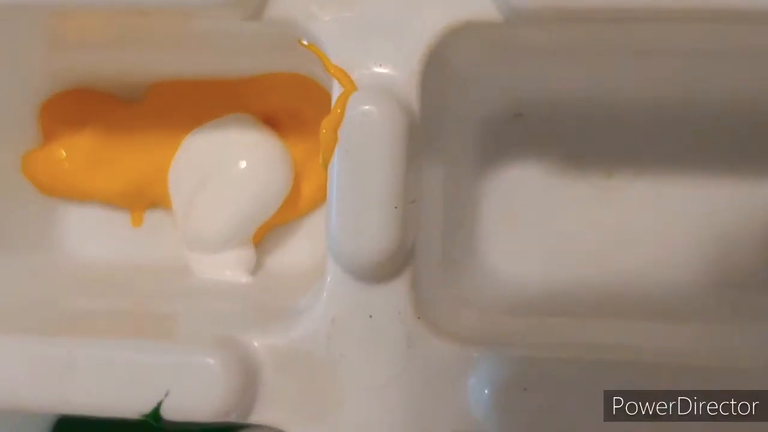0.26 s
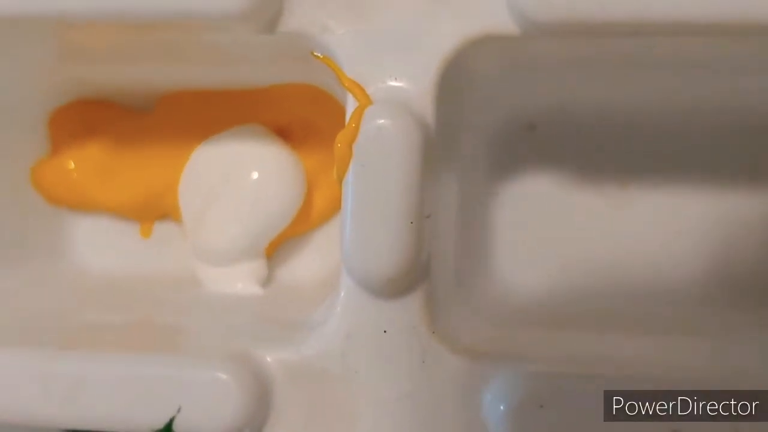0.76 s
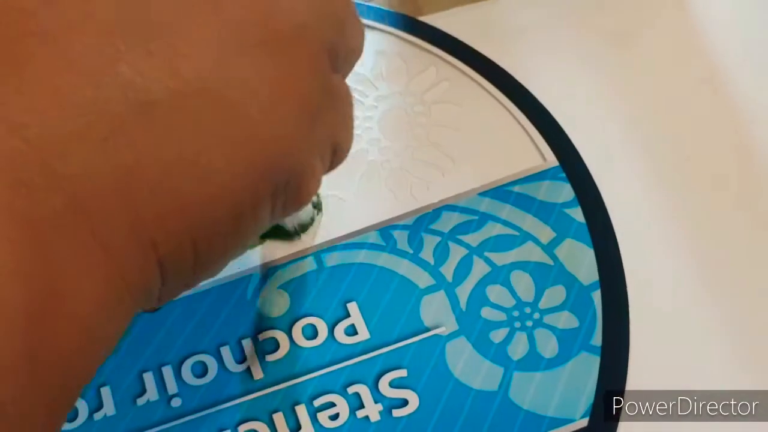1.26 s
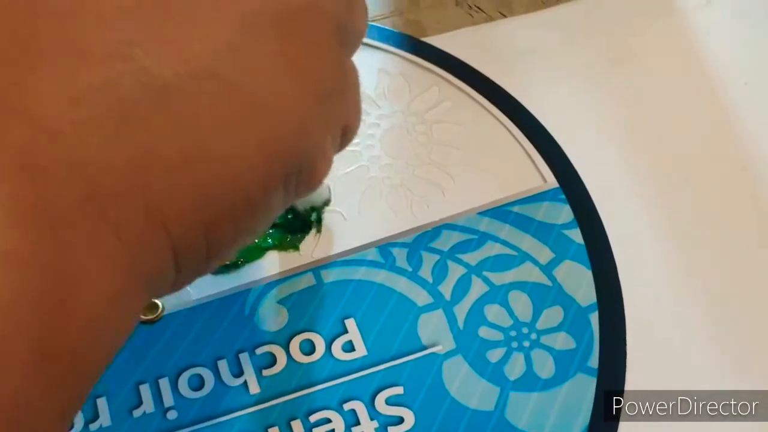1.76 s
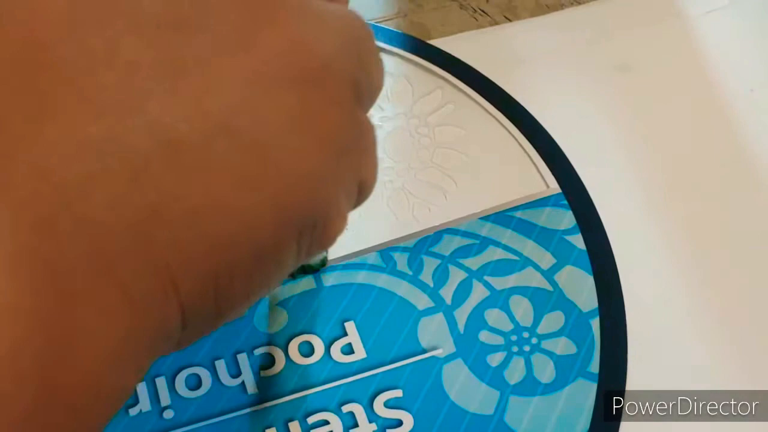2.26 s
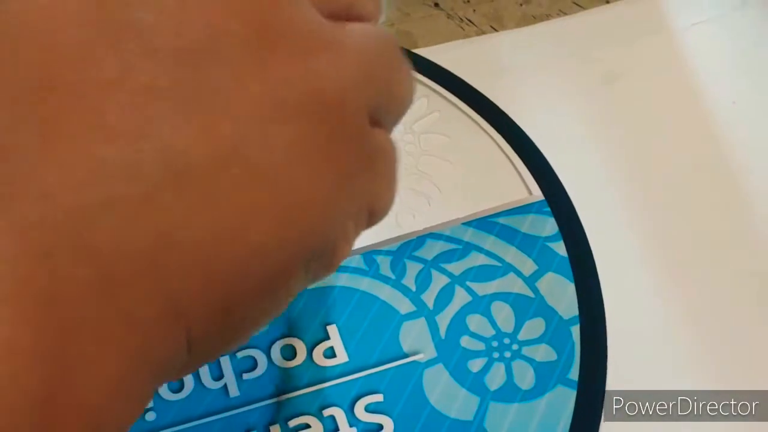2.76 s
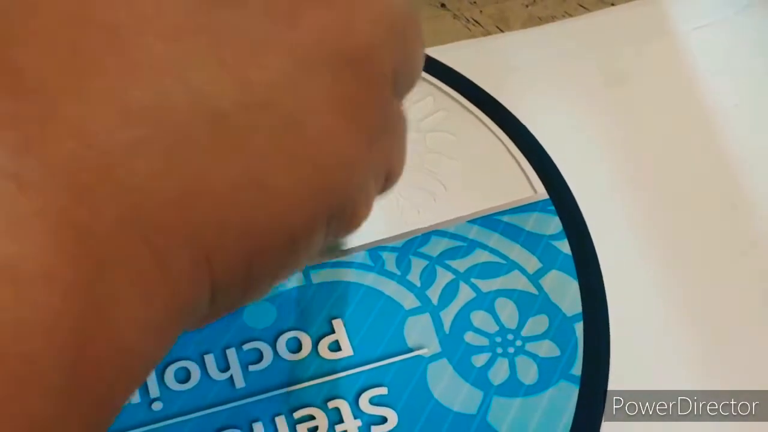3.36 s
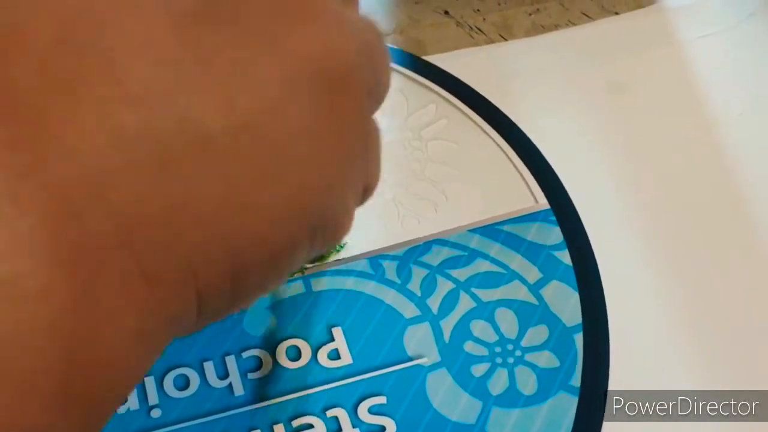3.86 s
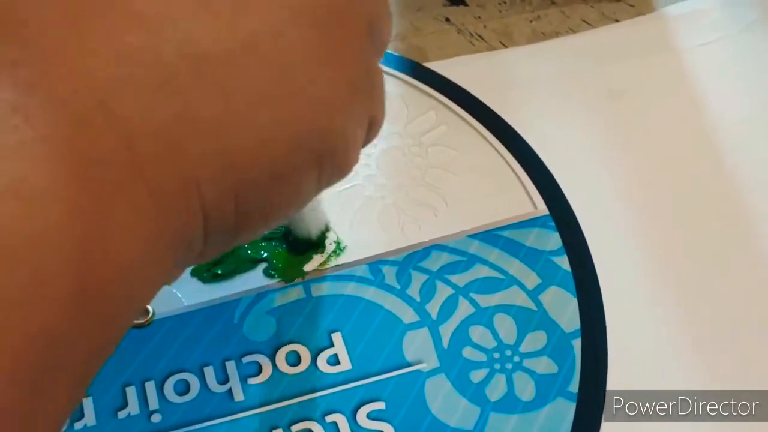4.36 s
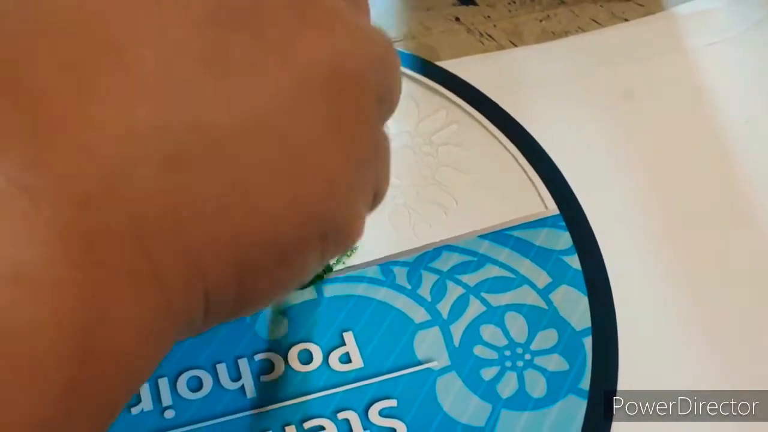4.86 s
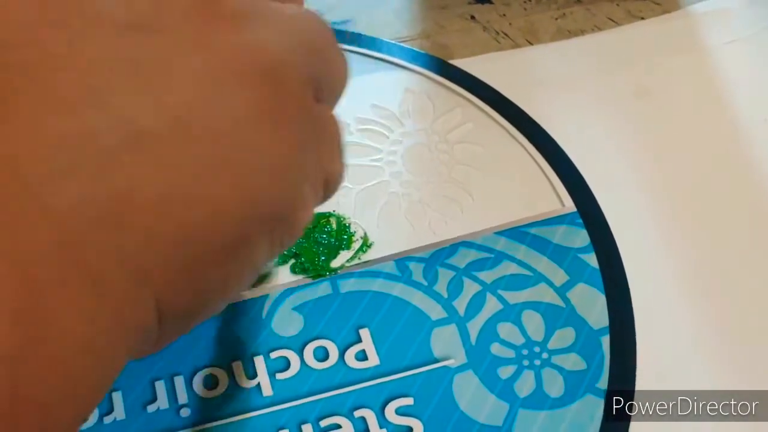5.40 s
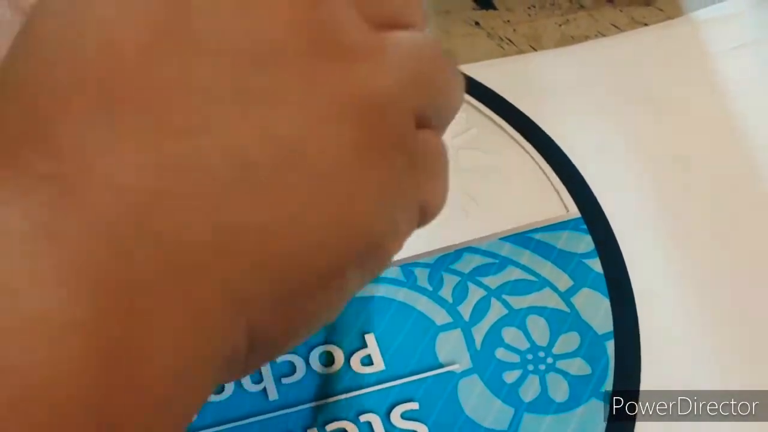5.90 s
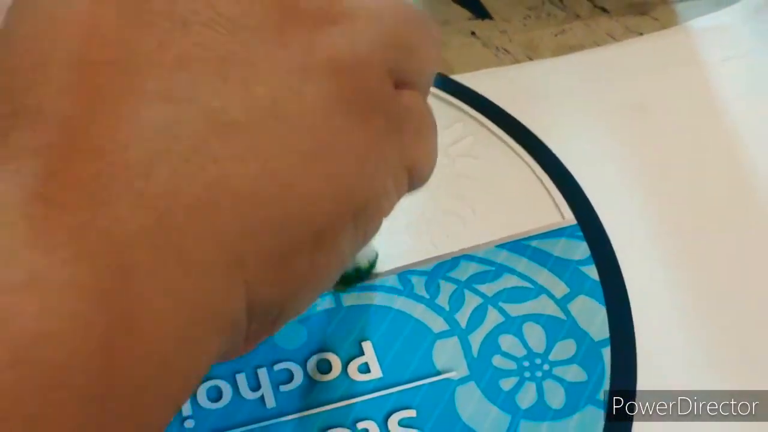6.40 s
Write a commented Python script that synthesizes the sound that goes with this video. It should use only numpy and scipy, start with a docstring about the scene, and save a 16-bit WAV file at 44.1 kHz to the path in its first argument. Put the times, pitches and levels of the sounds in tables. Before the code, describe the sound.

After a near-silent moment with one muffled bump, a bristle brush abruptly starts dabbing tacky paint through plastic onto drum-like canvas, close up.

```python
"""A stencil brush dabs paint through plastic onto stretched canvas, close to a phone's two microphones in a small room.
Each dab is a crunch of noise grains for the bristle tips, decaying sines for canvas and frame,
and a swelling run of grains as the tacky paint peels; bursts of noise make the stencil snaps and soft ticks.
A hush of shaped noise with one muffled bump comes first; the dabbing starts abruptly with a click,
over a soft noise wash and a low wavering hum that sinks away."""
import sys
import numpy as np
from scipy import signal
from scipy.fft import rfft, irfft
from scipy.io import wavfile
from scipy.ndimage import uniform_filter1d

SR = 44100
rng = np.random.default_rng(int(sys.argv[2]) if len(sys.argv) > 2 else 0)


def transcribe(u):
    """Save the signal u as a 16-bit wav file named by the first command-line argument.

    u: samples, shape (n,) or (channels, n), limited to [-1, 1]; the rate is SR.
    q: integer samples, one column per channel.
    """
    v = np.clip(np.atleast_2d(u).T, -1, 1)
    q = np.round(v * 32767).astype(np.int16)
    wavfile.write(sys.argv[1], SR, q)


N = 292824
TIME = np.arange(N) / SR
HIT = TIME[:SR // 2]  # the half second given to each single sound
START_S = .7495  # the dabbing and its background are silent before this


def undb(db):
    """Decibels to gain."""
    return 10 ** (np.asarray(db) / 20)


def unit(x):
    """Scale to rms 1."""
    return x / np.sqrt(np.mean(x ** 2))


def add(track, s, x):
    """Mix x into the two-channel track from time s."""
    i = min(int(s * SR), N)
    track[:, i:i + x.shape[1]] += x[:, :N - i]


def convolve(x, response):
    """Pass x through one response, or through one for each channel."""
    return signal.fftconvolve(np.atleast_2d(x), np.atleast_2d(response), axes=1)[:, :N]


def colour(x, points, size=2048, keep_power=True):
    """Causal minimum-phase filter with the given (frequency [Hz], level [dB]) spectrum."""
    hz, db = np.transpose(points)
    bins = np.maximum(np.fft.rfftfreq(size, 1 / SR), 1)
    log_gain = np.log(undb(np.interp(np.log(bins), np.log(hz), db)))
    # folding the cepstrum onto positive times makes the filter causal
    cepstrum = irfft(log_gain)
    cepstrum[1:size // 2] *= 2
    cepstrum[size // 2 + 1:] = 0
    response = irfft(np.exp(rfft(cepstrum)))
    if keep_power:
        response = response / np.linalg.norm(response)
    return convolve(x, response)


def band(x, hz, kind):
    """Gentle low-, high- or band-pass."""
    return signal.sosfilt(signal.butter(2, hz, kind, fs=SR, output="sos"), x)


def grains(rate, spread_db):
    """Tiny clicks of unequal size at random times, rate a second on average; rms 1."""
    n = len(HIT)
    sizes = undb(spread_db * np.clip(rng.standard_normal(n), -2, 2)) * rng.choice([-1, 1], n)
    struck = rng.random(n) < rate / SR
    return unit(sizes * struck)


def waver(rate):
    """Smooth random wander through rate new values a second, with a spread near 1."""
    return np.interp(TIME * rate, np.arange(1000), rng.standard_normal(1000))


def diffuse(size, apart_hz=750, own_db=-8):
    """Noise from all around: nearly alike at both microphones in the bass, unrelated in the treble."""
    common, own = rng.standard_normal(size), rng.standard_normal((2, size))
    shared_bass = band(common, apart_hz, "lowpass")
    separate_treble = band(own, apart_hz, "highpass")
    return shared_bass + separate_treble + undb(own_db) * rng.standard_normal((2, size))


def place(x, near_db=-4, near_s=0.0031):
    """Hand and table scatter the treble into the two close microphones, differently from each spot."""
    early = HIT[:len(HIT) // 20]
    scatter = band(rng.standard_normal((2, len(early))), 1600, "highpass") * np.exp(-early / near_s)
    near = undb(near_db) * scatter / np.linalg.norm(scatter, axis=1, keepdims=True)
    # direct sound: the left microphone is nearer by a few samples
    near[0, 0] += 1
    near[1, rng.integers(5, 10)] += 1
    return convolve(x, near)


# spectrum of the quiet room: (frequency [Hz], relative level [dB per Hz])
HUSH_SPECTRUM = [(25, -4), (80, -1), (130, -7), (270, -13), (520, -13), (900, -19), (2600, -33.5),
                 (4800, -37), (12000, -47.5)]
# spectrum of the muffled bump: (frequency [Hz], relative level [dB per Hz])
BUMP_SPECTRUM = [(50, -20), (120, -2.5), (190, 0.5), (270, -12), (380, 0), (520, -3), (650, -24),
                 (1500, -33), (5000, -56)]


def hush(floor_db=-72, bump_db=-61, bump_s=0.37, bump_width_s=0.057):
    """Steady shaped noise for the quiet room, and a short swell of low noise for the one muffled bump."""
    bump = colour(diffuse(N), BUMP_SPECTRUM) * np.exp(-((TIME - bump_s) / bump_width_s) ** 2)
    return undb(floor_db) * colour(diffuse(N), HUSH_SPECTRUM) + undb(bump_db) * bump


# spectrum of the soft background wash: (frequency [Hz], relative level [dB per Hz])
WASH_SPECTRUM = [(28, -0.5), (55, -3.5), (150, -9.5), (280, -17), (450, -17), (700, -16), (1200, -14),
                 (2300, -29.5), (4500, -37.5), (8000, -39), (12000, -43)]
# slow course of the wash, before the room's microphone colour: (time [s], level [dB])
WASH_COURSE = [(.75, -55), (1.4, -64.5), (2.85, -72), (3.4, -62), (6.64, -62.5)]


def wash():
    """Diffuse noise around the microphones sinks, then swells again, with a slight flutter."""
    level_db = np.interp(TIME, *np.transpose(WASH_COURSE)) + 0.42 * waver(rate=17)
    return colour(diffuse(N), WASH_SPECTRUM) * undb(level_db)


def hum(hum_hz=166.2, start_db=-56, fade_db_per_s=11, sinks_s=1.1, sag_octaves_per_s=0.38):
    """Three unsteady sines fade steadily from the start; from sinks_s on their pitch falls too."""
    hz = hum_hz * 2 ** (-sag_octaves_per_s * np.maximum(TIME - sinks_s, 0))
    lines = 0
    for ratio, line_db in [(1, 0), (1.2, -8), (1.43, -13)]:
        phase = 2 * np.pi * np.cumsum(ratio * hz * (1 + 0.012 * waver(rate=33))) / SR
        lines = lines + np.sin(phase) * undb(line_db + 3.7 * waver(rate=23))
    return lines * undb(start_db - fade_db_per_s * (TIME - START_S))


# dabs: (time [s], force [dB over an ordinary dab], bristle crunch [dB], canvas pitch [Hz],
#        woody click [dB], paint tack [dB])
DABS = [(0.7435, -2.5, -37.5, 98.5, -72, -52), (.938, -1, -36, 102.3, -53.5, -61),
        (1.1162, -4, -40.5, 101, -55, -53.5), (1.34, 2.5, -41, 80, -53, -53),
        (1.5363, -4, -46, 96, -57.5, -61.5), (1.722, -4.5, -40, 94, -55.5, -50),
        (1.928, 2, -39, 86, -56.5, -48.5), (2.123, -5, -45, 70, -56, -54),
        (2.344, -1.5, -48.5, 69.4, -62.5, -72), (2.5852, 4, -43.5, 88, -52.5, -44),
        (2.81, -1.5, -46.5, 85, -63, -45), (3.0548, -.5, -45, 78.5, -49.5, -44),
        (3.2969, 2, -38, 86, -53, -53.5), (3.54, 5, -39.5, 75.7, -59, -45),
        (3.767, 5, -42.5, 74.6, -52.5, -52.5), (3.988, 1.5, -43.5, 98.5, -57, -58.5),
        (4.1821, -2.5, -42.5, 90, -54, -56.5), (4.378, -3, -43, 95, -51, -47),
        (4.558, -4, -41, 96.5, -57, -57), (4.7611, 1, -43.5, 67, -51.5, -54.5),
        (5.0387, 10.5, -37, 92.8, -56.5, -51), (5.2573, 9, -37.5, 94.7, -54.5, -49),
        (5.5135, 9, -42.5, 87.4, -51.5, -45), (5.7252, 2.5, -42, 68.6, -49, -58),
        (5.9225, -6, -43, 58, -58, -62.5), (6.1165, -6.5, -47, 76.4, -66, -56.5),
        (6.32, -4.5, -49.5, 98, -56, -61), (6.5171, -6.5, -48, 100, -58.5, -57.5)]
# spectrum of bristle tips on the plastic: (frequency [Hz], relative level [dB per Hz])
CRUNCH_SPECTRUM = [(150, -24.5), (500, -8), (1000, -17), (1600, -0.5), (2200, 0), (3000, 1.5), (4500, -7),
                   (6000, -8), (6800, -2.5), (8000, -22), (11500, -30)]
# the stencil rings a little differently under every dab: centre [Hz], spread [octaves]
SHEET_HZ, SHEET_SPREAD = 4040, 0.23
# tips of an ordinary dab land over this time [s], with this crunch [dB]
LANDING_S, CRUNCH_DB = 0.0026, -42
LANDING_GROWTH = 0.54  # dB per dB: a firm dab that crunches little comes in at a slant and lands longer


def bristles(splay_db=-16, splay_s=0.039, crackle_db=6, sheet_db=-8, early_db=-14, early_s=0.0022):
    """Stray hairs touch first, tips land within milliseconds, then crackle as they splay; the stencil colours all."""
    out = np.zeros((2, N))
    lead_s = .02  # room for the stray hairs
    t = HIT - lead_s
    after = np.maximum(t, 0)
    for s, force, db, *_ in DABS:
        length = LANDING_S * undb(LANDING_GROWTH * (force - (db - CRUNCH_DB)))
        sheet_hz = SHEET_HZ * 2 ** np.clip(SHEET_SPREAD * rng.standard_normal(), -1, 1)
        contact = 1 - np.exp(-after / 0.00095)
        stray = undb(early_db) * np.exp(-np.abs(t) / early_s)
        landing = np.exp(-(after / length) ** 2) * contact + stray
        splay = undb(splay_db) * np.exp(-after / splay_s) * contact
        crunch = landing * grains(rate=20000, spread_db=0.0) + splay * grains(rate=1800, spread_db=crackle_db)
        ring = band(crunch, [sheet_hz * .75, sheet_hz * 1.3], "bandpass")
        add(out, s - lead_s, undb(db) * place(crunch + undb(sheet_db) * ring))
    return colour(out, CRUNCH_SPECTRUM)


# modes of frame and board, detuned a little per dab: (frequency [Hz], level [dB], 60 dB decay time [s])
FRAME_MODES = [(121.5, 8, 0.17), (157.7, 2, 0.31), (247, -1.5, 0.2), (310.7, -1, 0.12), (396, 4, 0.066),
               (467, 1.5, 0.045), (518, -1, 0.056), (524, -24, 0.011), (595, -11.5, 0.11),
               (796, -10.5, 0.028)]
# how strongly the spot being painted drives the frame: (time [s], level [dB])
FRAME_DRIVE = [(.75, -2.5), (2.8, -2), (4.2, 2), (5.2, 0), (6.6, -1)]
# spectrum of the dry woody click: (frequency [Hz], relative level [dB per Hz])
CLICK_SPECTRUM = [(100, -17), (350, -2.5), (700, -1.5), (1100, 0.5), (1600, -9), (2500, -10.5), (6000, -26)]
# knock of an ordinary dab [dB], and its growth with force [dB per dB]
KNOCK_DB, KNOCK_GROWTH = -62.5, 0.6


def frame(push_s=0.0096, detune=0.018, click_s=0.011):
    """The uneven push of buckling bristles rings the frame, differently at each spot, with a dry woody click."""
    out, clicks = np.zeros((2, 2, N))
    hz, db, t60 = np.transpose(FRAME_MODES)[:, :, None]
    for s, force, _, _, wood_db, _ in DABS:
        tuning, spot = rng.standard_normal((2, len(FRAME_MODES), 1))
        decay = undb(db + spot - 60 * HIT / t60)
        modes = decay * np.sin(2 * np.pi * hz * (1 + detune * tuning) * HIT)
        push = grains(rate=2700, spread_db=4.0) * HIT / push_s * np.exp(-(HIT / push_s) ** 2 / 2)
        rings = signal.fftconvolve(push[None], modes, axes=1)[:, :len(HIT)]
        # every mode takes its share of the blow
        knock = (undb(db) * rings / rings.std(axis=1, keepdims=True)).sum(axis=0)
        knock_db = KNOCK_DB + KNOCK_GROWTH * force + np.interp(s, *np.transpose(FRAME_DRIVE))
        add(out, s, undb(knock_db) * place(unit(knock)))
        buckling = grains(rate=5000, spread_db=4.5) * np.sqrt(HIT / click_s) * np.exp(1 - HIT / click_s)
        add(clicks, s, undb(wood_db) * place(buckling))
    return out + colour(clicks, CLICK_SPECTRUM)


# thump of an ordinary dab [dB]; the canvas gives way this long after the dab's time [s]
THUMP_DB, PRESS_S = -39, 0.0028
# spots slacker, so lower in pitch, than this [Hz] give more overtone [dB per octave]
CANVAS_HZ, SLACK_DB_PER_OCTAVE = 81, 13.5


def canvas(rise_s=0.0061, hold_s=0.025, overtone_hz=171, overtone_db=-7, overtone_growth=0.27,
           ring_db=-30, ring_s=0.11):
    """The canvas swings two or three times like a slack drum, until the pressed brush damps it."""
    out = np.zeros((2, N))
    damping = np.exp(-(HIT / hold_s) ** 6) + undb(ring_db) * np.exp(-HIT / ring_s)
    for s, force, _, hz, *_ in DABS:
        rise = 1 - np.exp(-HIT * undb(force / 2) / rise_s)  # a firm dab sets it going sooner
        upper_hz = overtone_hz * (1 + 0.02 * rng.standard_normal())
        upper_db = overtone_db + overtone_growth * force + SLACK_DB_PER_OCTAVE * np.log2(CANVAS_HZ / hz)
        drum = np.sin(2 * np.pi * hz * HIT) + undb(upper_db) * np.sin(2 * np.pi * upper_hz * HIT)
        sag = undb(-30) * np.sin(2 * np.pi * 32 * HIT) * np.exp(-HIT / 0.047)  # the whole board rocks
        add(out, s + PRESS_S, undb(THUMP_DB + force) * place(drum * rise * damping + sag))
    return out


# how long the hand keeps the brush down, before the rebound: (time of the dab [s], hold [s])
HOLD_COURSE = [(.75, 0.074), (1.72, 0.077), (2.6, 0.11), (3.8, 0.09), (4.38, .075), (4.76, 0.091),
               (6.6, 0.089)]
REBOUND_S_PER_DB = .0016  # a firm dab rebounds sooner


def lift_time(s, force):
    """When the brush that landed at s with this force comes free."""
    return s + np.interp(s, *np.transpose(HOLD_COURSE)) - REBOUND_S_PER_DB * force


# spectrum of the peeling paint: (frequency [Hz], relative level [dB per Hz])
PEEL_SPECTRUM = [(100, 3), (400, -1.5), (1000, -4), (2000, 2), (3000, -3), (4400, -3.5), (5500, -8),
                 (6700, -2.5), (8000, -14), (11500, -19)]
# paint of this tack [dB] has this build-up time [s]; tackier paint lets go more suddenly [dB per dB]
TACK_DB, BUILD_S, BUILD_SHORTENING = -52.5, .014, 0.63


def peels(release_s=0.014, lead_s=.06, creep_db=-7, snap_s=0.0014):
    """Threads of tacky paint break, swelling exponentially until the brush comes free with a last tug."""
    out = np.zeros((2, N))
    t = HIT - lead_s
    for s, force, *_, tack_db in DABS:
        build = BUILD_S * undb(BUILD_SHORTENING * (TACK_DB - tack_db))
        pull = undb(creep_db) * np.exp(np.minimum(t / (2 * build), -t / release_s))
        tug = np.exp(-np.abs(t) / snap_s) * min(0.0068 / build, 1)  # a quick lift ends more sharply
        threads = (pull + tug) * grains(rate=9000, spread_db=2.5)
        add(out, lift_time(s, force) - lead_s, undb(tack_db) * place(threads))
    return colour(out, PEEL_SPECTRUM)


# loudest snaps of the stencil coming unstuck:
# (time [s], peak level [dB before the boost in scene()], brightest frequency [Hz])
LOUD_SNAPS = [(.786, -45.5, 4470), (1.762, -55.5, 4630), (3.380, -52, 4220), (3.671, -48.5, 4900),
              (3.698, -46, 5200), (3.871, -45, 4360), (5.568, -46, 5100), (5.817, -56, 4400)]
# faint snap around every lift: level [dB before the same boost], its spread [dB], spread in time [s]
FAINT_SNAP_DB, FAINT_SPREAD_DB, FAINT_SPREAD_S = -66.5, 2.5, 0.0076


def snaps(decay_s=0.00027, body_db=-12):
    """Short cracks that ring the thin plastic sheet: a few loud ones, and a faint one around every lift."""
    out = np.zeros((2, N))
    faint = []
    for s, force, *_ in DABS:
        late, loud, bright = rng.standard_normal(3)
        snap_s = lift_time(s, force) + FAINT_SPREAD_S * late
        snap_hz = SHEET_HZ * 2 ** (SHEET_SPREAD * bright)
        faint.append((snap_s, FAINT_SNAP_DB + FAINT_SPREAD_DB * loud, snap_hz))
    for s, db, hz in list(LOUD_SNAPS) + faint:
        crack = rng.standard_normal(len(HIT)) * np.exp(-HIT / decay_s)
        ring = band(crack, [hz * .8, hz * 1.2], "bandpass")
        snap = ring + undb(body_db) * crack
        add(out, s, undb(db) * place(snap / np.abs(snap).max(), near_db=-13.5))
    return colour(out, CRUNCH_SPECTRUM)


# light touches of the hand on the board between dabs:
# (time [s], peak level [dB before a 6 dB boost], frequency [Hz])
HAND_TOUCHES = [(4.531, -52, 750), (6.038, -53.5, 513), (6.283, -55, 835)]


def touches(decay_s=0.0014):
    """Soft, dull ticks on the board: band-passed bursts of noise."""
    out = np.zeros((2, N))
    for s, db, hz in HAND_TOUCHES:
        burst = rng.standard_normal(len(HIT)) * np.exp(-HIT / decay_s)
        tick = band(burst, [hz / 2, hz * 2.3], "bandpass")
        add(out, s, undb(db + 6) * place(tick / np.abs(tick).max()))
    return out


# colour of the small room's tail: (frequency [Hz], gain [dB])
ROOM_COLOUR = [(40, -4), (150, -1), (400, 7), (1000, 8), (2500, -5), (4500, 1.5), (11000, 6)]


def space(x, room_db=-9, t60_s=0.26, late_s=0.0014):
    """The small room rings on: a diffuse, exponentially decaying tail."""
    tail = diffuse(len(HIT)) * undb(-60 * HIT / t60_s) * (1 - np.exp(-HIT / late_s))
    tail /= np.linalg.norm(tail, axis=1, keepdims=True)
    return x + undb(room_db) * colour(convolve(x, tail), ROOM_COLOUR, keep_power=False)


# colour of the two microphone ports: (frequency [Hz], left gain [dB], right gain [dB])
PORT_COLOUR = [(68.5, 7.5, 6), (287, 9, 9.5), (1310, -1.5, 3.5), (1740, 0.5, 1.5), (2070, 4.5, -1),
               (2640, -5, -6), (2653, -1.5, 5.5), (3435, 3, 8.5), (4160, 0.5, 13.5), (5210, 1, 14),
               (6120, -4.5, -0.5), (6320, 7.5, -6.5), (7500, -9, -3), (8380, 1.5, 2)]


def microphones(x):
    """Each microphone port lends its channel its own colour."""
    ports = np.array(PORT_COLOUR)
    left, right = [colour(x[c], ports[:, [0, c + 1]], keep_power=False) for c in range(2)]
    return np.vstack([left, right])


def suppress(x, threshold_db=-69, depth_db=-7, window_s=0.03):
    """Noise suppression: all but the bass ducks when little sound passes through."""
    upper = signal.sosfiltfilt(signal.butter(2, 350, "highpass", fs=SR, output="sos"), x)
    power = uniform_filter1d(np.mean(upper ** 2, axis=0), int(window_s * SR))
    shut = 1 / (1 + (power / undb(2 * threshold_db)) ** 2)
    return x + upper * (undb(depth_db * shut) - 1)


def scene():
    """The dabbing sets in with a click after the hush, which lies under it to the end."""
    brush = space(bristles() + frame() + canvas() + peels() + touches())
    stencil = space(undb(7.0) * snaps(), room_db=-11.5)
    work = (brush + stencil + wash() + hum()) * (TIME >= START_S)
    heard = suppress(microphones(work))
    start_click = -undb(-29.5) * np.exp(-HIT / 0.0011)
    add(heard, START_S, start_click[None])
    return heard + hush()


def record(dry):
    """The phone cuts the top, steeply above 12 kHz."""
    return signal.sosfilt(signal.ellip(8, .2, 60, 12000, fs=SR, output="sos"), dry)


dry = scene()
out = record(dry)
transcribe(out)
```